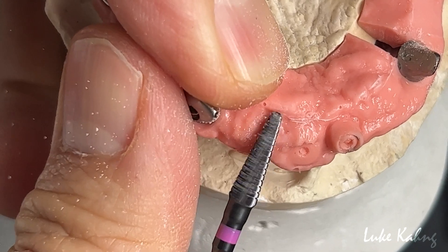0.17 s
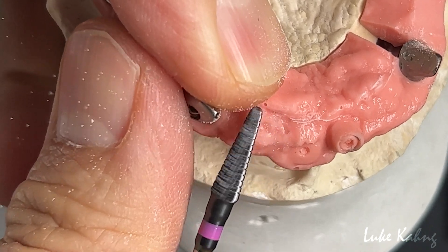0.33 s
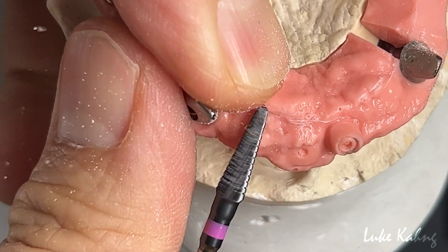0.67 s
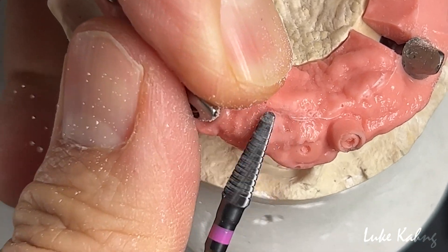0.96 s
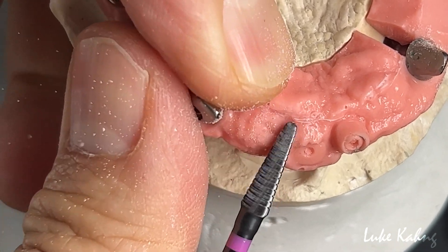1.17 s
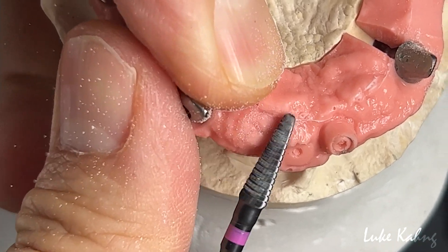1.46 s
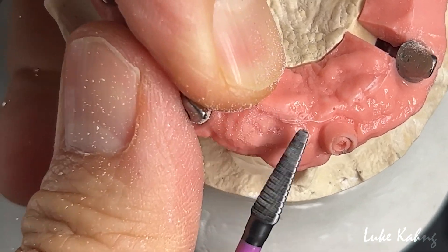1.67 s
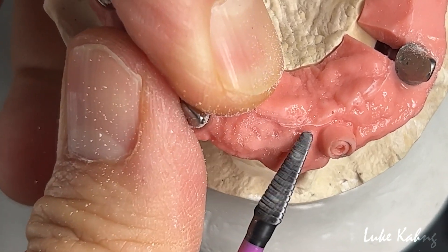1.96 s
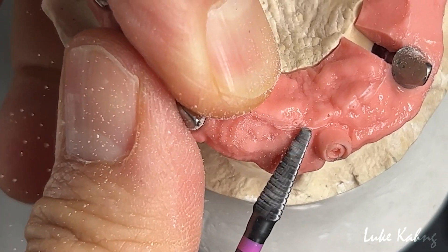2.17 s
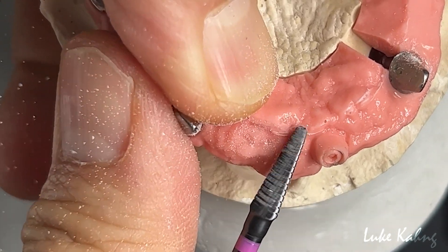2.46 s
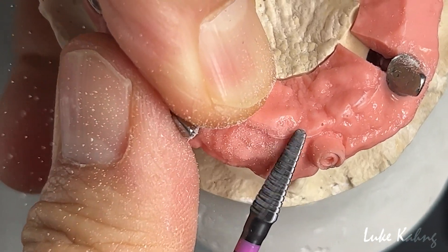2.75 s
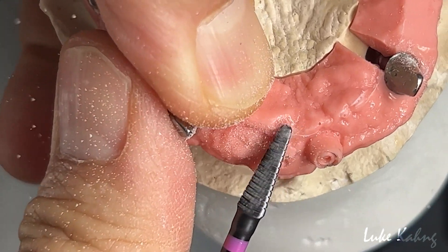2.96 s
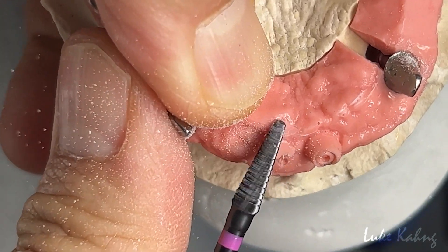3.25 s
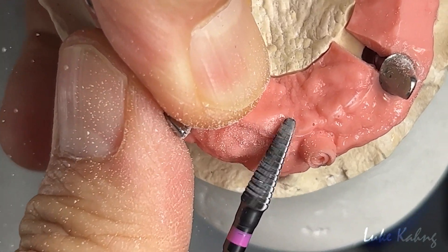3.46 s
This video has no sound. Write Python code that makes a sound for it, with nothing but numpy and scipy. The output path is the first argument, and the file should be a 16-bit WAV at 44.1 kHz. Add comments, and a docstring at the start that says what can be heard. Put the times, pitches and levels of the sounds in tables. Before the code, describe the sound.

A small dental micromotor whines thinly, its pitch wavering upward, while the bur trims a resin model; brief chattering rasps grow stronger later. A dust extractor roars and hums steadily behind. Close stereo microphone at the bench.

```python
"""A dental micromotor with a fluted bur trims a resin model, close to a two-port microphone.
Its bearings whine in thin tones at fixed multiples of a shaft speed that sags as the bur is pressed on.
Firmer strokes chatter: a knock once a turn, mixed with scraping, rings the model and the bur.
Behind it a dust extractor roars steadily, as noise coloured by hose and bench resonances, and hums."""
import sys
import numpy as np
from scipy import signal
from scipy.fft import rfft, irfft, next_fast_len
from scipy.io import wavfile
from scipy.ndimage import uniform_filter1d, map_coordinates

SR = 44100
rng = np.random.default_rng(int(sys.argv[2]) if len(sys.argv) > 2 else 0)


def transcribe(u):
    """Save the signal u as a 16-bit wav file named by the first command-line argument.

    u: samples, shape (n,) or (channels, n), limited to [-1, 1]; the rate is SR.
    q: integer samples, one column per channel.
    """
    v = np.clip(np.atleast_2d(u).T, -1, 1)
    q = np.round(v * 32767).astype(np.int16)
    wavfile.write(sys.argv[1], SR, q)


N = 158760
TIME = np.arange(N) / SR  # s
FFT_LENGTH = next_fast_len(N + 8192)  # zero padding leaves room for the ringing
HZ = np.fft.rfftfreq(FFT_LENGTH, 1 / SR)


def amp(db):
    """Level in decibels to amplitude ratio."""
    return 10 ** (np.asarray(db) / 20)


def unit(x):
    """Normalisation to an RMS value of one."""
    return x / np.sqrt(np.mean(x ** 2) + 1e-20)


def along(points):
    """Interpolation of (f/Hz, value) points on a logarithmic frequency axis."""
    f, value = np.transpose(points)
    return np.interp(np.log(HZ + 1), np.log(f + 1), value)


def filtered(x, response):
    """Linear filtering: the spectrum of x times a response given on HZ."""
    return irfft(rfft(x, FFT_LENGTH) * response, FFT_LENGTH)[..., :N]


def peaks(rows):
    """Second-order resonance: one complex band-pass response per (f/Hz, width/Hz, level/dB) row."""
    return [amp(db) * 1j * HZ * width / (centre ** 2 - HZ ** 2 + 1j * HZ * width)
            for centre, width, db in rows]


def wobble(rate):
    """Slow random modulation: a spline through random knots, rate knots a second."""
    knots = rng.standard_normal(int(N * rate / SR) + 4)
    return map_coordinates(knots, [TIME * rate])


def sine(turns):
    """Pure tone of unit RMS value whose phase is given in turns."""
    return np.sqrt(2) * np.sin(2 * np.pi * turns)


def shaft():
    """Rotation kinematics: speed in turns per s, its integral in turns, and the main whine's level in dB."""
    # course of the motor: t/s, shaft speed/(turns per s), main whine level/dB
    motor = [(0.0, 197.5, -70), (0.093, 197.3, -70), (0.134, 200.0, -70), (0.232, 211.8, -56),
             (0.316, 211.4, -52), (0.525, 219.1, -57), (0.604, 220.1, -56), (0.708, 226.1, -42),
             (0.871, 221.1, -45), (0.961, 223.8, -45), (1.033, 229.6, -46), (1.202, 221.9, -46),
             (1.353, 229.7, -46), (1.477, 222.3, -45), (1.617, 232.0, -48), (1.721, 228.7, -42),
             (1.855, 233.0, -47), (1.982, 231.6, -53), (2.142, 236.7, -43), (2.293, 235.3, -44),
             (2.392, 241.3, -46), (2.641, 233.8, -44), (2.783, 246.4, -51), (2.905, 239.6, -48),
             (2.961, 238.9, -49), (3.051, 251.0, -52), (3.08, 252.7, -51), (3.126, 246.5, -53),
             (3.225, 241.9, -47), (3.26, 242.2, -48), (3.326, 250.1, -56), (3.37, 252.5, -55),
             (3.529, 242.7, -56), (3.602, 245.6, -65)]
    s, speed, whine_db = np.transpose(motor)
    speed = uniform_filter1d(np.interp(TIME, s, speed), size=SR // 30)
    turns = np.cumsum(speed) / SR
    return speed, turns, np.interp(TIME, s, whine_db)


def bearing_tone(order, turns, db, waver_db):
    """Order tone: its frequency is a fixed multiple of the shaft speed, with its own level and phase waver."""
    level = db + waver_db * wobble(14)
    blur_turns = .07 * wobble(60)
    return amp(level) * sine(order * turns + blur_turns + rng.random())


def bearings(speed, turns, whine_db):
    """Order spectrum of the bearings: a main whine, and weaker tones modified by casing resonance."""
    # shaft speeds at which the weak tones' levels are listed: speed/(turns per s)
    speeds = [198, 222, 245]
    # weak bearing tones: frequency/(multiples of the shaft speed)
    orders = [23.79, 25.08, 25.95, 27.49, 28.94, 29.5, 30.01, 32.48, 33.61, 35.2, 35.57, 38.9, 41.01, 42.96,
              47.53, 50.31, 50.62, 51.49, 59.15, 59.99, 67.6]
    # their levels before the casing: slow level/dB, middle level/dB, fast level/dB
    tone_levels = [(-57, -59, -60), (-48, -59, -66), (-64, -60, -54), (-52, -53, -55), (-68, -64, -59),
                   (-55, -58, -52), (-64, -60, -61), (-68, -62, -66), (-58, -56, -60), (-56, -59, -65),
                   (-60, -59, -70), (-66, -63, -65), (-72, -67, -62), (-62, -61, -68), (-77, -70, -67),
                   (-58, -65, -78), (-59, -65, -78), (-76, -72, -76), (-70, -80, -68), (-78, -82, -71),
                   (-76, -65, -62)]
    # casing resonances, added to the direct sound: f/Hz, width/Hz, level/dB
    casing = [(4980, 250, 3), (6320, 160, 4), (9120, 220, 6)]
    weak = 0
    for order, levels in zip(orders, tone_levels):
        weak = weak + bearing_tone(order, turns, np.interp(speed, speeds, levels), waver_db=3)
    whine = bearing_tone(42.1, turns, whine_db, waver_db=1)
    return whine + filtered(weak, 1 + sum(peaks(casing)))


def ring(knocks, scrape, scrape_share, rows):
    """Forced resonance: knocks and scraping, mixed by power share, drive sharpened resonances."""
    drive = np.sqrt(1 - scrape_share) * unit(knocks) + np.sqrt(scrape_share) * unit(scrape)
    # each response times its own magnitude: narrower, with the same peak gain
    response = sum(p * abs(p) / abs(p).max() for p in peaks(rows))
    return unit(filtered(drive, response))


def chatter(turns):
    """Periodic impact excitation: one knock a turn, plus scraping, rings the model and the bur in each stroke."""
    # strokes of the bur: middle t/s, length at half height/s, model ring level/dB, bur ring level/dB
    strokes = [(1.2, .05, -48, -53), (1.53, .05, -45, -60), (2.15, .08, -38, -52), (2.23, .08, -47, -47),
               (2.31, .05, -36, -49), (2.37, .03, -39, -62), (2.45, .04, -42, -62), (2.55, .07, -36, -60),
               (2.635, .04, -37, -44), (2.69, .065, -35, -56), (2.905, .05, -32, -54),
               (2.96, .04, -35, -56), (3.195, .035, -29, -58), (3.26, .06, -38, -60),
               (3.425, .04, -35, -60), (3.465, .025, -35, -60), (3.515, .045, -33, -57),
               (3.57, .03, -38, -62)]
    # resonances of the model, relative levels: f/Hz, width before sharpening/Hz, level/dB
    model_rings = [(4650, 250, -9), (4930, 280, 0), (5370, 350, -8), (5900, 400, -14)]
    # resonances of the bur, relative levels: f/Hz, width before sharpening/Hz, level/dB
    bur_rings = [(9200, 700, 0), (14750, 1300, -5)]
    knocks = 0
    # nearly aligned overtones add up to a pulse once a turn
    for k in range(14, 68):
        unevenness = amp(2 * wobble(20))
        phase_turns = rng.normal(0, .15)
        knocks = knocks + unevenness * np.cos(2 * np.pi * (k * turns + phase_turns))
    # the noise swells once a turn
    scrape = rng.standard_normal(N) * (1 + np.cos(2 * np.pi * turns))
    body = ring(knocks, scrape, .1, model_rings)
    bite = ring(knocks, scrape, .4, bur_rings)

    out = np.zeros(N)
    for middle, length, body_db, bite_db in strokes:
        press = np.cos(np.pi * np.clip((TIME - middle) / (2 * length), -.5, .5)) ** 2
        out += press * (amp(body_db) * body + amp(bite_db) * bite)
    return out


def extractor():
    """Broadband flow noise through resonances, as parts common to and opposed in two partly coherent channels."""
    # random level flicker by frequency: f/Hz, depth/dB
    flicker = [(300, .5), (3000, 0.3), (6000, 1.3), (10000, 2.5), (15000, 1.5)]
    # spectral density of the air noise: f/Hz, level/(dB per Hz)
    air = [(10, -90), (30, -83), (42, -99), (56, -57), (95, -65), (200, -58.5), (300, -61.5), (440, -54.5),
           (700, -62), (800, -70), (1400, -69), (1620, -79), (1800, -74.5), (2080, -75.5), (2300, -69),
           (3600, -66), (3750, -76.5), (4400, -73), (5500, -72), (7000, -81), (8600, -82.5), (9500, -84),
           (11300, -86), (12200, -103), (13000, -102), (14000, -92), (14600, -91.5), (15700, -94)]
    # hose and bench resonances: f/Hz, width before sharpening/Hz, level/(dB per Hz)
    hose = [(117.6, 14.7, -55), (341.4, 30, -54), (394.8, 23, -45.5), (499.4, 38, -46.5), (573, 31, -49.5),
            (629, 42.5, -51.5), (684.7, 16, -54), (1234, 67, -68.5), (1880, 214, -71), (2440, 99, -62.5),
            (2777, 134, -60.5), (3035, 78, -61), (3310, 154, -58), (3476, 124, -60.5), (3922, 330, -66.5),
            (4087, 81, -67), (4630, 55, -68), (5056, 88, -66)]
    # magnitude-squared coherence of the noise, left and right: f/Hz, coherence
    likeness = [(60, 0.95), (600, 0.87), (790, 1), (1000, 1), (1600, 0.55), (1900, 1), (4300, 0.81),
                (5700, 1), (7400, .995), (7900, 1), (8500, 0.43), (9000, 0.81), (10200, 1), (11000, 0.94),
                (12000, .95), (14700, .6), (15500, .95)]
    hz, _, spectra = signal.stft(rng.standard_normal((2, N)), SR, nperseg=512)
    depth_db = np.interp(hz, *np.transpose(flicker))[:, None]
    # smoothed over 6 frequency bins and 12 frames
    field = uniform_filter1d(rng.standard_normal(spectra.shape[1:]), size=6, axis=0)
    field = uniform_filter1d(field, size=12, axis=1)
    flickering = spectra * amp(depth_db * unit(field))
    pair = signal.istft(flickering, nperseg=512)[1][:, :N]
    pair = unit(pair * amp(.5 * wobble(3.05)))  # slow swell

    resonant_power = sum(abs(p) ** 4 / abs(p).max() ** 2 for p in peaks(hose))
    colour = np.sqrt((amp(along(air)) ** 2 + resonant_power) * SR / 2)
    # the angle divides the power so that left and right correlate by the root of the coherence
    angle = np.arccos(np.sqrt(np.clip(along(likeness), 0, 1))) / 2
    return filtered(pair, colour * [np.cos(angle), np.sin(angle)])


def hum():
    """Mains-frequency vibration of the extractor's motor: steady pitches with slowly wavering levels."""
    # hum tones: f/Hz, level/dB
    mains = [(60, -52), (120, -54.5)]
    return sum(amp(db + 1.7 * wobble(2.3)) * sine(hz * TIME) for hz, db in mains)


def scene():
    """Stereo difference: a phase lead and level tilt between left and right, set by frequency."""
    # phase lead of left over right: f/Hz, lead/rad
    lead = [(60, 0), (400, -.2), (600, .35), (800, -1.3), (1200, -.5), (1600, -1), (1950, 0), (2350, 0),
            (3100, .7), (5000, .35), (5600, 0), (8650, 0), (9200, -1.6), (10200, -3.1), (11700, -6.2),
            (12700, -6.5), (13300, -9.4), (14200, -9.5), (15200, -12.5)]
    # level of left minus right: f/Hz, difference/dB
    tilt = [(60, 0), (330, 0), (500, -2.5), (640, 3), (790, 17.5), (950, -6.5), (1400, 6.5), (1800, 0),
            (2740, -1), (4200, 0)]
    speed, turns, whine_db = shaft()
    tool = bearings(speed, turns, whine_db) + chatter(turns)
    air_common, air_apart = extractor()
    common = tool + air_common + hum()
    # each channel takes half of the lead and tilt, in opposite senses
    left = amp(along(tilt) / 2) * np.exp(.5j * along(lead))
    channels = np.array([common + air_apart, common - air_apart])
    return filtered(channels, np.array([left, 1 / left]))


def record(dry):
    """Band limitation: an ideal low-pass removes everything from 15780 Hz up."""
    return filtered(dry, HZ < 15780)


dry = scene()
out = record(dry)
transcribe(out)
```